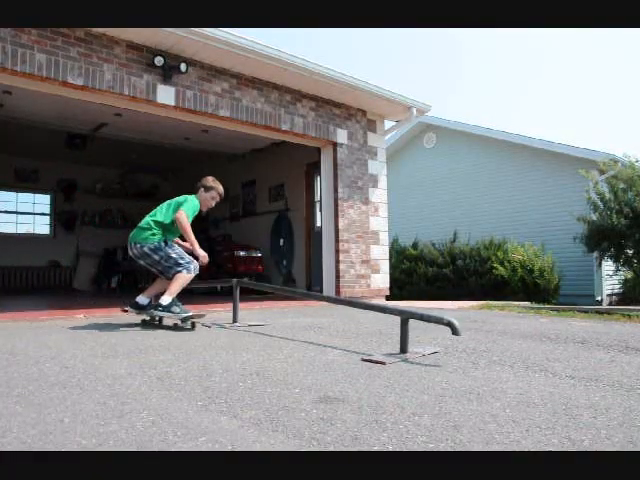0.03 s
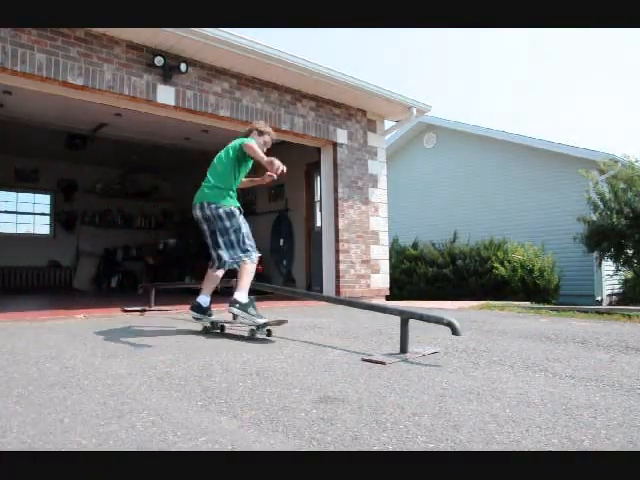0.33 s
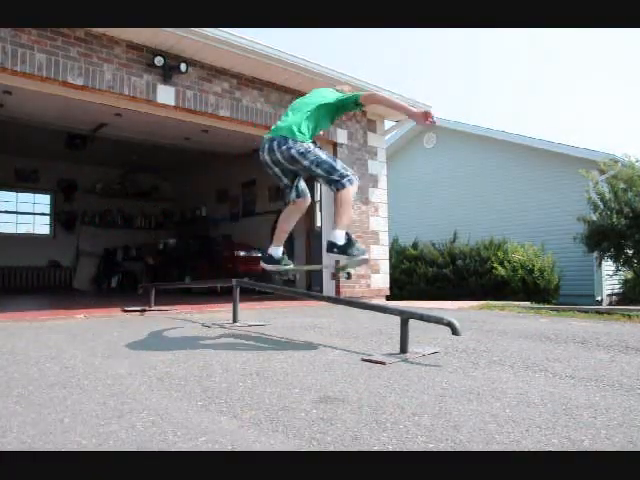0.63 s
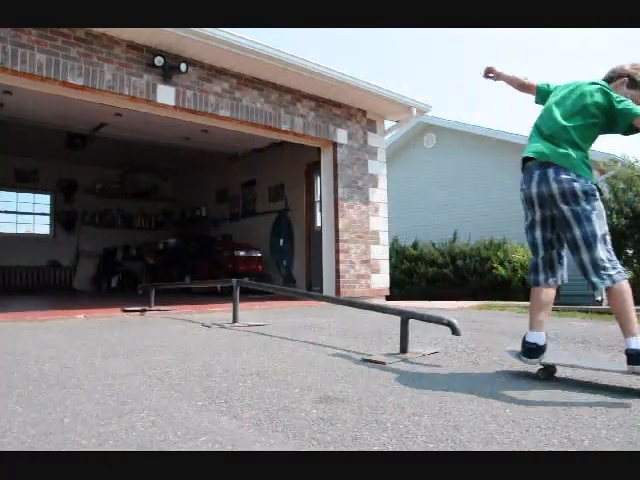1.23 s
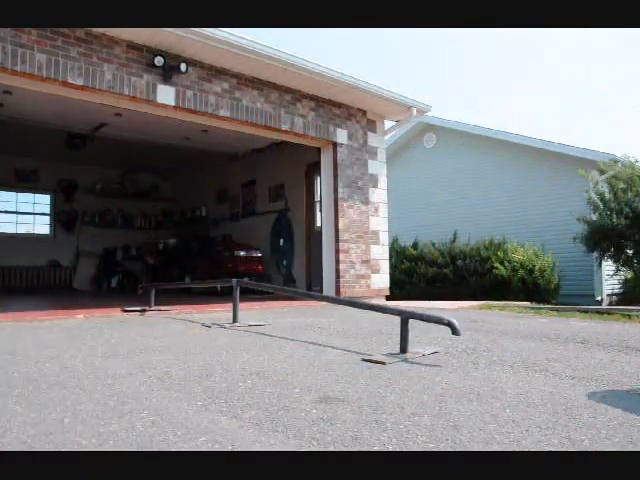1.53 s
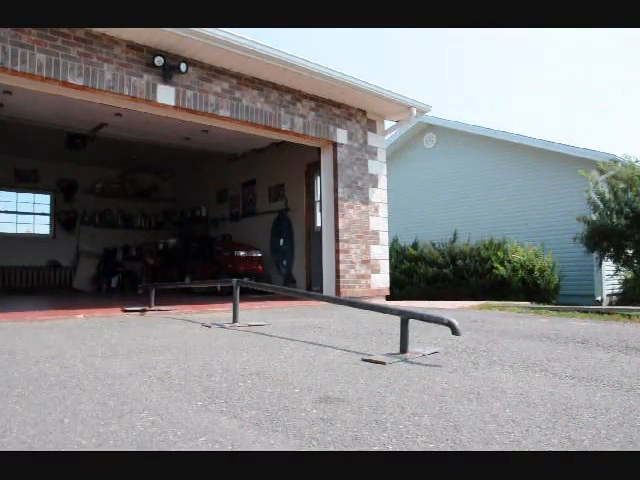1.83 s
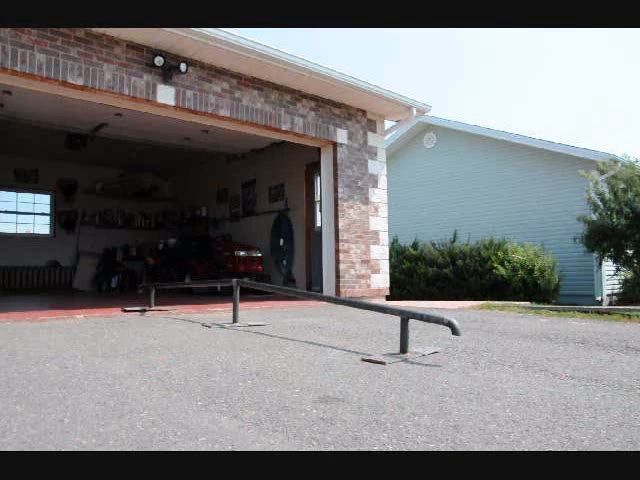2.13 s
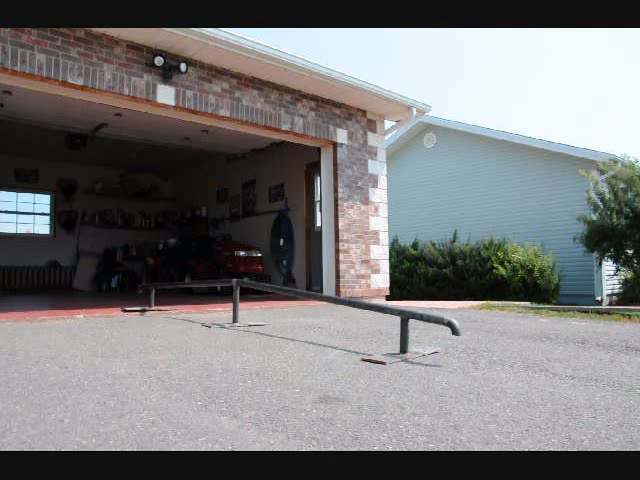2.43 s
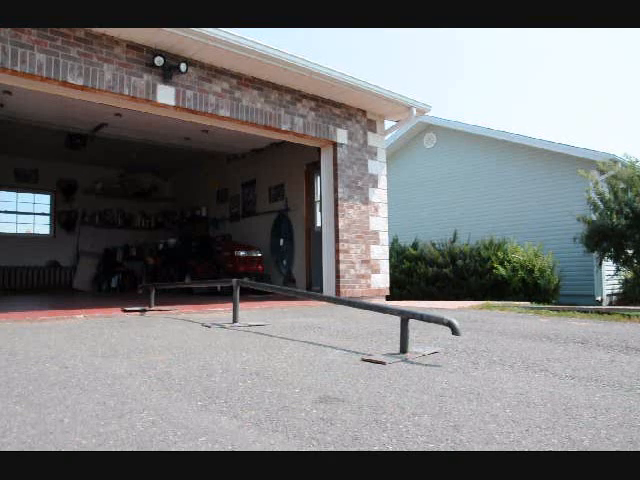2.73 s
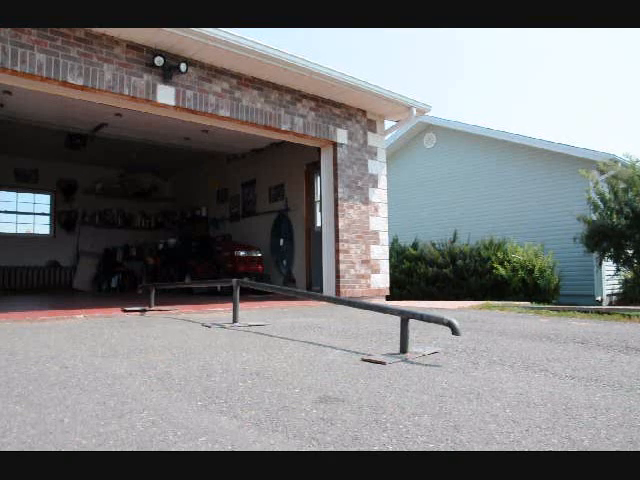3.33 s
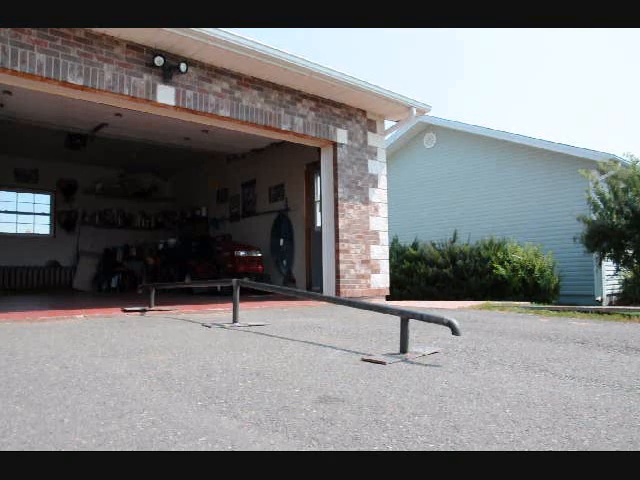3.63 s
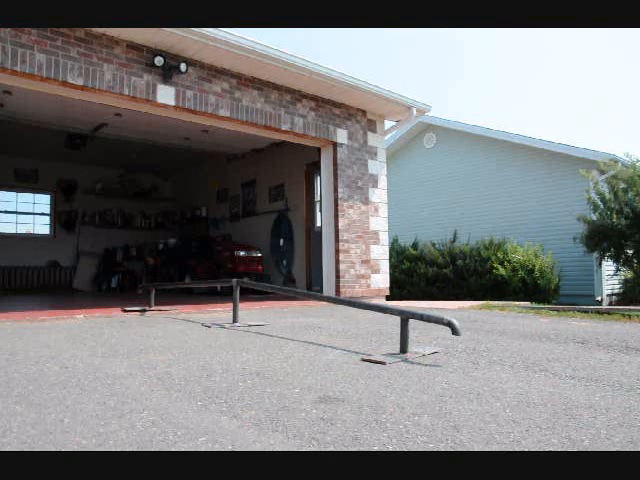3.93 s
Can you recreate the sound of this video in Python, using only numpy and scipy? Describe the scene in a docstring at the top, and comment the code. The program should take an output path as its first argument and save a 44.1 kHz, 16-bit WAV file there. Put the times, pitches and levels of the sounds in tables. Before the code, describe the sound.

A skateboard rolls over rough asphalt, pops up and grinds briefly along a ringing steel rail. It lands with a clatter and rolls on over small bumps, outdoors, with faint wind on a dull-sounding microphone.

```python
"""Skateboard wheels rumble and rasp over coarse asphalt, outdoors by an open garage. The board pops an
ollie, slams onto a steel rail and grinds along it, metal catching and slipping while the rail sings.
It drops off the end, lands in a clatter of tail and wheels and rolls away over bumps.
The garage answers the knocks and light gusts buffet the single microphone;
the dull-sounding recorder overloads on the hardest blows."""
import sys
import numpy as np
from scipy import signal
from scipy.fft import rfft, irfft, next_fast_len
from scipy.io import wavfile
from scipy.ndimage import uniform_filter1d, map_coordinates

SR = 44100
rng = np.random.default_rng(int(sys.argv[2]) if len(sys.argv) > 2 else 0)


def wrap_up_sound(samples):
    """Save the sound to the file named by the first command line argument, as 16-bit audio."""
    columns = np.atleast_2d(samples).T
    # keep every value between -1 and 1, then stretch to whole-number steps
    tamed = np.clip(columns, -1, 1)
    steps = np.round(tamed * 32767).astype(np.int16)
    wavfile.write(sys.argv[1], SR, steps)


N = 176400

# the steel rail's modes (frequency [Hz], level [dB])
RAIL_MODES = [(361, -3.5), (889, -2.5), (1153, -4), (1262, 5), (1538, 1.5), (2245, -4.5), (2896, -2),
              (3136, -2.5), (3623, -5.5), (4475, 2), (4539, -5), (4963, -11.5)]
# trucks sliding on the rail (time [s], scrape level [dB], hiss level [dB])
GRIND_LEVELS = [(.772, -14.5, -9.5), (.81, -20, -19), (.83, -23, -15.5), (.89, -20.5, -20), (.96, -24, -26),
                (1.05, -20, -23.5), (1.11, -25.5, -29.5), (1.2, -21.5, -31)]
GRIND_START_S, GRIND_END_S = GRIND_LEVELS[0][0], GRIND_LEVELS[-1][0]
CONTACT_FADE_S, SNAP_S = 0.074, 0.0004
RUMBLE_EDGE_HZ, TREBLE_EDGE_HZ, MIC_TOP_HZ = 855, 2370, 5230


def amp(db):
    """Decibels to gain."""
    return 10 ** (np.asarray(db) / 20)


def unit(x):
    """Scale to rms 1."""
    return x / np.sqrt(np.mean(x ** 2) + 1e-20)


def spectrum_gain(points, hz):
    """Gain along (frequency [Hz], level [dB]) points on a log frequency axis."""
    f, db = np.transpose(points)
    return amp(np.interp(np.log(hz + 1), np.log(f + 1), db))


def clock():
    """The time of each sample."""
    return np.arange(N) / SR


def curves(rows):
    """One value per sample for each column after the time."""
    times, *columns = np.transpose(rows)
    return [np.interp(clock(), times, column) for column in columns]


def swells(rows):
    """Gain of bell-shaped swells (time [s], level [dB], half length [s])."""
    return sum(amp(db) * np.exp(-((clock() - s) / half) ** 2) for s, db, half in rows)


def wobble(per_s):
    """A smooth random curve with per_s knots a second."""
    return map_coordinates(rng.standard_normal(N // 20), [clock() * per_s])


def filtered(x, response):
    """Pass x through a complex response of frequency."""
    size = next_fast_len(len(x) + SR // 10)
    return irfft(rfft(x, size) * response(np.fft.rfftfreq(size, 1 / SR)), size)[:len(x)]


def shaped(x, spectrum, band=lambda f: 1):
    """Colour x with a spectrum, within an optional band, at rms 1."""
    return unit(filtered(x, lambda f: spectrum_gain(spectrum, f) * band(f)))


def below(hz, edge_hz, order=8):
    """Low-pass gain."""
    return 1 / np.sqrt(1 + (hz / edge_hz) ** (2 * order))


def above(hz, edge_hz):
    """High-pass gain."""
    return np.sqrt(1 - below(hz, edge_hz) ** 2)


def resonances(modes, f):
    """Response of modes (frequency [Hz], width [Hz], level [dB]) of alternating sign."""
    return sum((-1) ** k * amp(db) * 1j * f * width / (hz * hz - f * f + 1j * f * width)
               for k, (hz, width, db) in enumerate(modes))


def grains(per_s, spread_db):
    """Tiny impacts of random size at random moments."""
    size = amp(spread_db * np.clip(rng.standard_normal(N), -2, 2)) * rng.choice([-1, 1], N)
    return unit(size * (rng.random(N) < per_s / SR))


def add(track, s, sound):
    """Mix a sound in at time s."""
    part = track[round(s * SR):][:len(sound)]
    part += sound[:len(part)]


def wind(air_db=-34):
    """Faint open-air hiss, with light gusts buffeting the microphone."""
    # spectra of the air and of the buffeting (frequency [Hz], level [dB])
    air_spectrum = [(30, -23.5), (250, -2), (1400, 0), (5300, -8)]
    buffet_spectrum = [(20, -28.5), (95, 1.5), (250, -13.5), (800, -86)]
    # gusts at the microphone (time [s], level [dB], half length [s])
    gusts = [(2.99, -24.5, .04), (3.33, -43.5, 0.3)]
    air = amp(air_db) * shaped(rng.standard_normal(N), air_spectrum)
    return air + swells(gusts) * shaped(rng.standard_normal(N), buffet_spectrum)


def garage(x, t60_s=0.29, build_s=0.035, start_db=-9.5, fall_db_per_s=1.5):
    """The open garage reverberates, weaker as the board moves away from it."""
    t = np.arange(SR // 2) / SR
    tail = rng.standard_normal(len(t)) * amp(-60 * t / t60_s) * np.clip(t / build_s, 0, 1) ** 2
    entering = x * amp(start_db - fall_db_per_s * clock())
    return signal.fftconvolve(entering, tail / np.linalg.norm(tail))[:N]


def shifting_load(x, depth_db=3):
    """The contact favours ever-changing pitches as the load on the board shifts."""
    spectrogram = signal.stft(x, nperseg=1024)[2]
    patches = uniform_filter1d(rng.standard_normal(spectrogram.shape), size=2, axis=0)
    patches = unit(uniform_filter1d(patches, size=7, axis=1))
    return signal.istft(spectrogram * amp(depth_db * patches), nperseg=1024)[1][:N]


def deck_drone(stones):
    """Shaken by the stones, the deck drones in swells."""
    # the deck's low modes (frequency [Hz], width [Hz], level [dB])
    drone_modes = [(267, 55, -3), (502, 13, -0.5), (615, 35, 4.5)]
    # swells of the drone (time [s], level [dB], half length [s])
    drone_swells = [(.15, -21, 0.11), (1.95, -26.5, 0.094), (2.3, -25, 0.06), (2.75, -12, 0.033),
                    (3.94, -17.5, 0.11)]
    drone = filtered(stones, lambda f: resonances(drone_modes, f) * below(f, RUMBLE_EDGE_HZ))
    return swells(drone_swells) * unit(drone)


def rolling(take_off_s=0.62, touch_down_s=1.25, stones_per_s=3000, spread_db=2.5, jolt_db=1.06):
    """Stones of the asphalt rattle wheels and deck, except while the board is off the ground."""
    # spectrum of wheels on asphalt (frequency [Hz], level [dB])
    asphalt = [(40, -36), (110, -11.5), (180, -1), (270, 1), (390, -1), (560, 4), (900, -2), (1500, -6.5),
               (2200, -9), (3000, -13), (5000, -17.5)]
    # course of the low rumble and of the midrange rasp (time [s], relative level [dB])
    rumble_levels = [(0, -18), (.35, -19), (.48, -30.5), (1.3, -31), (1.52, -27.5), (1.75, -24.5),
                     (1.95, -16.5), (2.13, -28.5), (2.21, -25.5), (2.28, -14.5), (2.45, -27), (2.58, -25.5),
                     (2.74, -17.5), (2.84, -23.5), (2.96, -18), (3.03, -26.5), (3.2, -20.5), (3.6, -19),
                     (3.7, -28.5), (3.83, -29), (3.92, -20), (4, -25)]
    rasp_levels = [(0, -21), (.22, -22), (.35, -14), (.48, -26), (1.33, -23.5), (1.5, -21.5), (1.7, -26),
                   (1.99, -16), (2.13, -20.5), (2.21, -18), (2.3, -17.5), (2.48, -23), (2.74, -18.5),
                   (2.84, -19), (2.93, -17.5), (3.02, -23), (3.18, -17.5), (3.62, -17.5), (3.7, -24.5),
                   (3.86, -32.5), (3.92, -19.5), (4, -22)]
    # the wheels' treble (time [s], level against the rasp [dB])
    hiss_levels = [(.3, -1.5), (1.4, -4.5), (2.0, -7), (2.6, -2.5), (3.3, -7.5), (3.8, -6)]
    rumble_db, rasp_db, hiss_db = curves(rumble_levels) + curves(rasp_levels) + curves(hiss_levels)
    t = clock()
    grounded = np.clip(np.maximum(take_off_s - t, t - touch_down_s) / CONTACT_FADE_S + 1 / 2, 0, 1)
    stones = shifting_load(grains(stones_per_s, spread_db)) * amp(jolt_db * wobble(per_s=60))
    rumble = shaped(stones, asphalt, lambda f: below(f, RUMBLE_EDGE_HZ))
    # 1j turns the phase a quarter cycle, so neighbouring bands add in power
    rasp = shaped(stones, asphalt, lambda f: 1j * above(f, RUMBLE_EDGE_HZ) * below(f, TREBLE_EDGE_HZ))
    hiss = shaped(stones, asphalt, lambda f: above(f, TREBLE_EDGE_HZ))
    wheels = amp(rumble_db + 2.5) * rumble + amp(rasp_db) * (rasp + amp(hiss_db) * hiss)
    return grounded * (wheels + deck_drone(grains(stones_per_s, spread_db)))


def cushioned(x, ceiling=0.95):
    """The soft wheels round off the biggest jolts."""
    return x / (1.5 + (x / ceiling) ** 4) ** 0.25


def blow(db, tilt_db, t60_s):
    """A short chatter of contact, heard directly and through the deck's resonances."""
    # spectrum of the direct crack (frequency [Hz], level [dB])
    crack_spectrum = [(30, -35), (150, -10), (400, 4), (1500, 4), (2800, -4.5), (3900, -11.5), (5300, -13)]
    # modes of the board's wood and trucks (frequency [Hz], width [Hz], level [dB])
    deck_modes = [(463, 76, 3), (630, 30, 9.5), (795, 85, -1.5), (1123, 100, 11.5), (1593, 100, 2),
                  (2147, 120, 7.5), (3940, 1600, -8)]
    t = np.arange(SR // 5) / SR
    chatter = filtered(rng.standard_normal(len(t)), lambda f: f < MIC_TOP_HZ)
    contact = np.sign(chatter) * amp(-60 * t / t60_s) * (1 - np.exp(-t / SNAP_S))
    tilt = lambda f: amp(tilt_db * np.log2(np.clip(f, 500, MIC_TOP_HZ) / 1000)) * below(f, MIC_TOP_HZ)
    crack = shaped(contact, crack_spectrum, tilt)
    knock = amp(1) * unit(filtered(contact, lambda f: tilt(f) * resonances(deck_modes, f)))
    decay_rms = np.sqrt(t60_s / t[-1] / np.log(10 ** 6))
    return amp(db) * unit(crack + knock) * decay_rms


def bumps():
    """The wheels knock dully over cracks and tick on grit."""
    # wheels hitting cracks and pebbles (time [s], level [dB], brightness [dB/octave])
    wheel_hits = [(0.167, -5, -4), (1.36, -11.5, -5.5), (1.507, -9, -0.5), (1.913, -9.5, -5.5),
                  (2.174, -6, -2.5), (2.197, -9.5, 0), (2.389, -11, -3.5), (2.595, -7.5, -2.5),
                  (3.0338, 2, -3.5), (3.285, -5.5, -6.5), (3.438, -5.5, -8), (3.563, -2.5, -5),
                  (3.8, -8.5, -5.5), (3.877, -4, -8)]
    out = np.zeros(N)
    for s, db, tilt_db in wheel_hits:
        add(out, s, blow(db, tilt_db, t60_s=0.025))
    return out


def deck_thuds(t60_s=0.03):
    """The deck flexes under the landing rider's weight with short wooden thuds."""
    # flexes of the deck (time [s], frequency [Hz], level [dB])
    flexes = [(1.2525, 539, -3), (1.2665, 1126, -6), (1.305, 500, -8)]
    out, t = np.zeros(N), np.arange(SR // 5) / SR
    for s, hz, db in flexes:
        envelope = amp(db - 60 * t / t60_s) * (1 - np.exp(-t / SNAP_S))
        add(out, s, envelope * np.sin(2 * np.pi * hz * t))
    return out


def clacks():
    """Tail, trucks and wheels strike in the pop, the slam on the rail and the landing."""
    # the board's blows (time [s], level [dB], brightness [dB/octave], decay t60 [s])
    board_hits = [(0.504, -17.5, 0, 0.062), (.512, 2.5, 4, 0.02), (0.527, -7.5, 0, 0.031),
                  (0.561, -9, 6, 0.036), (.612, -20.5, 1, 0.29), (.769, 2, 2.5, 0.037),
                  (1.136, -16, -2, .02), (1.145, -11.5, 0.5, 0.1), (1.1901, 0.5, 8.5, 0.013),
                  (1.195, -12.5, -0.5, 0.079), (1.212, -5, 2, 0.025), (1.247, -12.5, 3, 0.079),
                  (1.252, -4, -3, 0.037), (1.2661, 1, -3.5, 0.026), (1.292, -6, -2, 0.035),
                  (1.305, -7.5, -2, 0.028), (1.328, -13, -0.5, 0.018)]
    out = np.zeros(N)
    for s, db, tilt_db, t60_s in board_hits:
        add(out, s, blow(db, tilt_db, t60_s))
    return out


def rail_ring(t60_s=0.4):
    """The rail rings when the board lands on it and when it clips the end."""
    # strikes on the rail (time [s], level [dB])
    rail_hits = [(0.768, -23.5), (1.1915, -33.5)]
    out, t = np.zeros(N), np.arange(SR) / SR
    for s, db in rail_hits:
        ring = sum(amp(mode_db) * np.sin(2 * np.pi * (hz * t + rng.random()))
                   for hz, mode_db in RAIL_MODES)
        add(out, s, amp(db - 60 * t / t60_s) * ring)
    return out


def rail_singing(start_db=-24, fall_db_per_s=15, waver_db=2, waver_per_s=12):
    """Friction keeps the rail's modes ringing, each wavering on its own, less as the board slows."""
    ring, t = np.zeros(N), clock()
    for hz, db in RAIL_MODES:
        gain = amp(db + waver_db * wobble(waver_per_s))
        phase = 2 * np.pi * (hz * t + rng.random()) + wobble(waver_per_s) / 2
        ring += gain * np.sin(phase)
    return amp(start_db - fall_db_per_s * np.maximum(t - GRIND_START_S, 0)) * unit(ring)


def grind(chatter_db=0.7):
    """Metal catches and slips on metal: a scrape and a hiss over the singing rail."""
    # spectrum of trucks scraping steel (frequency [Hz], level [dB])
    friction = [(40, -33), (200, -10.5), (400, -7), (1000, 2), (1600, 1), (2000, -3.5), (4700, -6),
                (5300, -4.5)]
    t = clock()
    sliding = (t > GRIND_START_S) * np.clip((GRIND_END_S - t) / CONTACT_FADE_S + 1, 0, 1)
    slips = shifting_load(grains(per_s=3400, spread_db=3.5)) * amp(chatter_db * wobble(per_s=71))
    scrape_db, hiss_db = curves(GRIND_LEVELS)
    scrape = shaped(slips, friction, lambda f: below(f, TREBLE_EDGE_HZ))
    hiss = shaped(slips, friction, lambda f: 1j * above(f, TREBLE_EDGE_HZ) * below(f, MIC_TOP_HZ))
    return sliding * (amp(scrape_db) * scrape + amp(hiss_db) * hiss + rail_singing())


def scene():
    """Board, rail and wind at one outdoor microphone within earshot of the garage."""
    blows, knocks = clacks() + deck_thuds(), bumps()
    wheels = cushioned(rolling() + knocks)
    return (wheels + blows + garage(blows + knocks) + rail_ring() + grind() + wind())[None]


def record(dry):
    """A narrow-band mono recorder whose output clips on the hardest blows."""
    dull = filtered(dry[0], lambda f: below(f, MIC_TOP_HZ, order=60))
    clipped = np.clip(dull, -1.03, 1.03)
    return filtered(clipped, lambda f: below(f, edge_hz=15800, order=40))[None]


dry = scene()
out = record(dry)
wrap_up_sound(out)
```